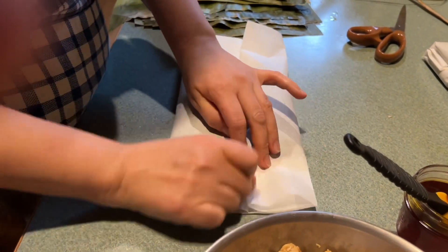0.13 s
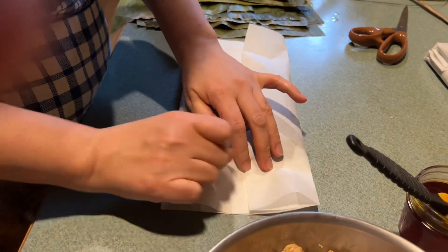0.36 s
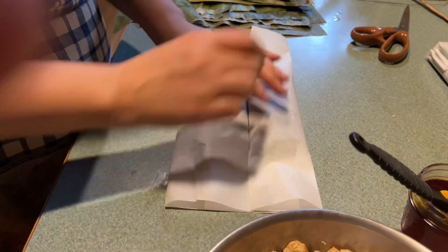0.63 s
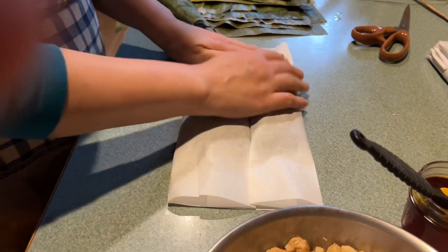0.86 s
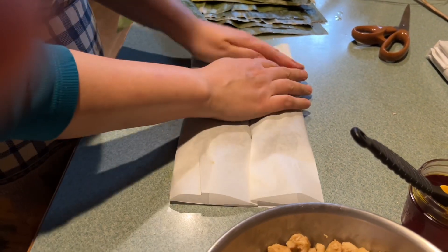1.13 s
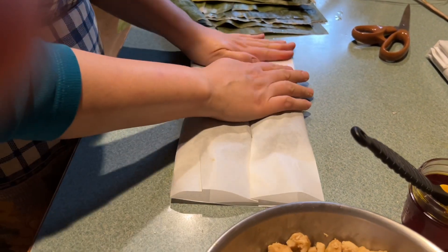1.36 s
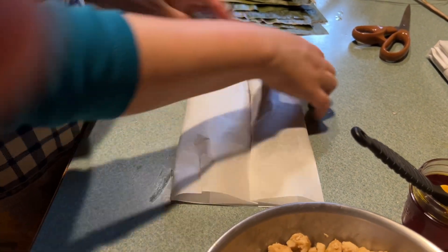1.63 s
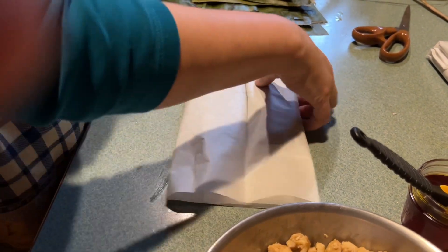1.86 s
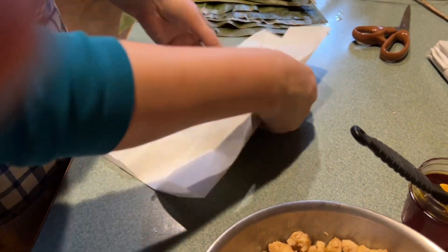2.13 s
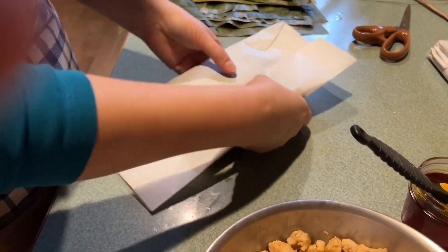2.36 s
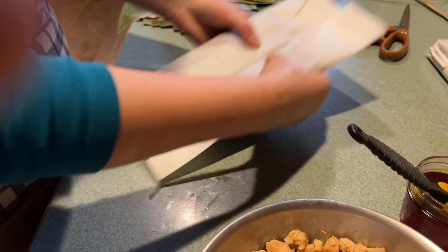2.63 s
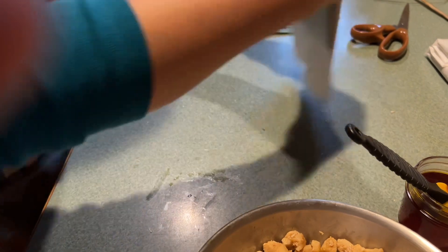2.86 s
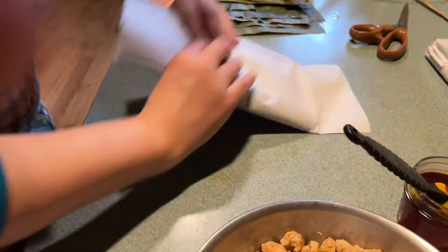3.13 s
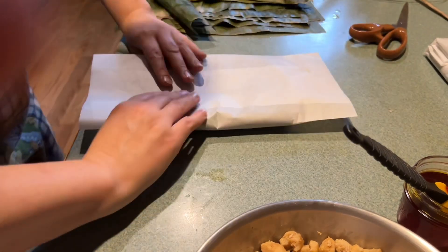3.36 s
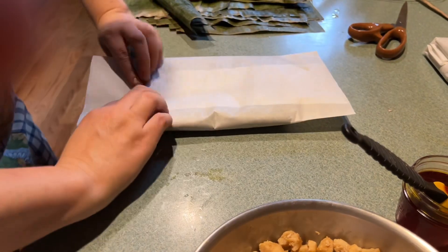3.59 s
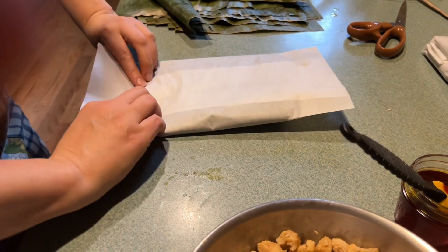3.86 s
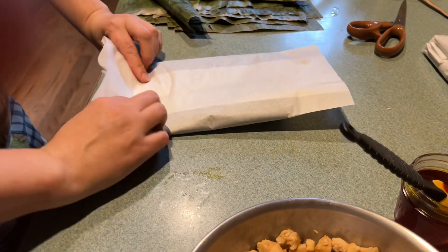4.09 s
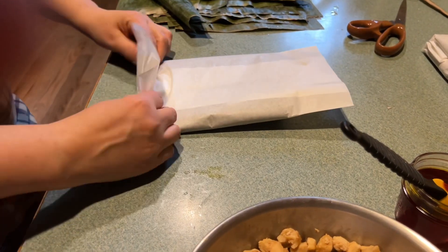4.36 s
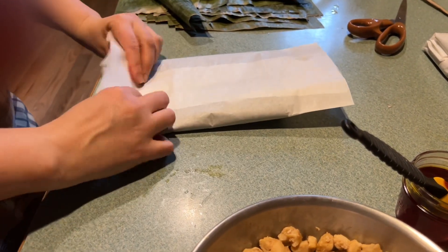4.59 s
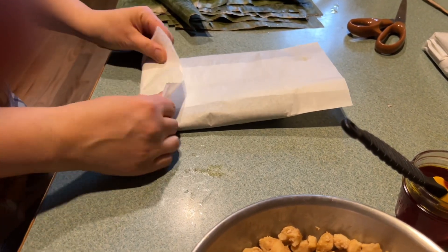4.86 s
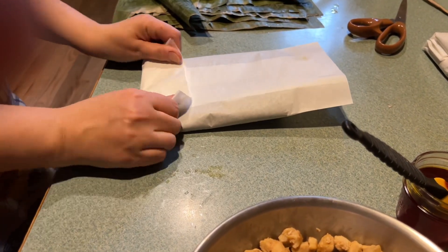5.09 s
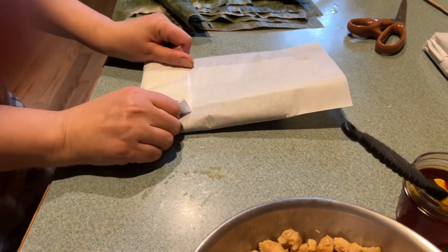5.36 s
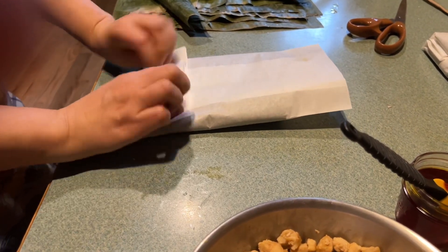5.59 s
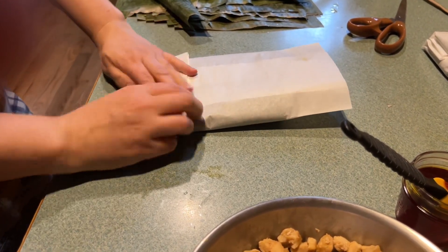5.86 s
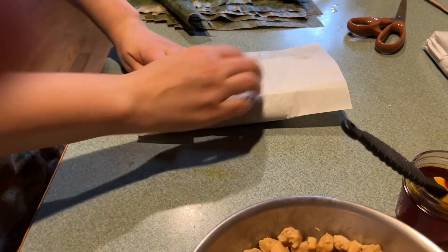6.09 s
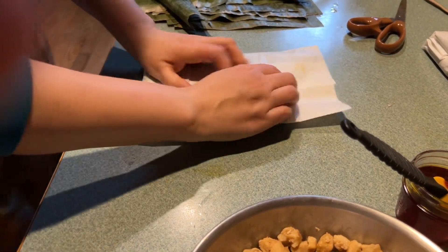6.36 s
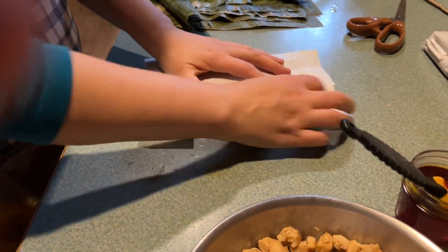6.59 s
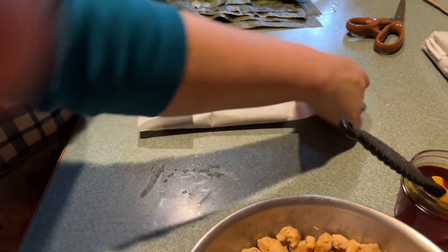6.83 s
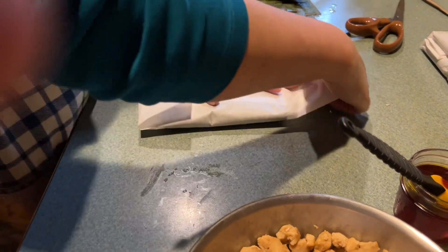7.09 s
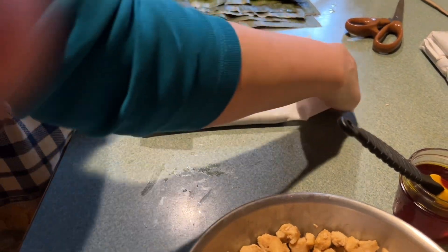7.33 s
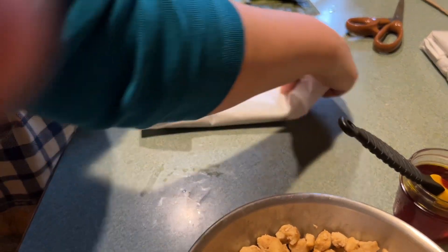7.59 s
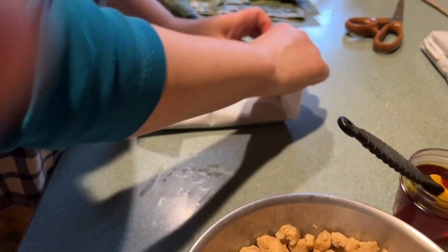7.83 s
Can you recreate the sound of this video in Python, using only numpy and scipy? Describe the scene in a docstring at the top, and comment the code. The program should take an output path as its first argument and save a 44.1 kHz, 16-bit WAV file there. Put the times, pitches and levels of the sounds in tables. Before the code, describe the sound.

Crisp, bright paper handling: loud crackles at the start, a quieter sliding rustle, one big sharp crumple as the sheet is flipped, then irregular snaps and creases that grow busy again in the last second or so. Occasional tiny hollow pops of flexing paper and dull counter bumps. Close stereo pickup, short small-room reflections, and a low appliance murmur underneath.

```python
"""On a kitchen counter, hands fold, crease and turn stiff paper around a parcel, close to a small stereo microphone.
Shaped noise makes the paper: sharp snaps, brief crushes of the whole sheet, fine crackle and a sliding rustle.
Damped sines make the short pitched pops of the sheet and the thuds of hands and parcel on the counter.
The kitchen answers with a short decaying noise tail over a low hum of filtered noise; a faint drone ends early."""
import sys
import numpy as np
from scipy import signal
from scipy.fft import rfft, irfft, next_fast_len
from scipy.io import wavfile
from scipy.ndimage import uniform_filter1d, map_coordinates

SR = 44100
rng = np.random.default_rng(int(sys.argv[2]) if len(sys.argv) > 2 else 0)


def invert_db(level):
    """Linear amplitude ratio for a level in decibels (20 dB per decade), elementwise."""
    return 10 ** (np.asarray(level, dtype=float) / 20)


def put_to_file(sound):
    """Save the sound as 16-bit audio at rate SR, in the file named by the first command-line argument."""
    columns = np.atleast_2d(sound).T  # one column per channel
    safe = np.clip(columns, -1, 1)
    whole_steps = np.round(safe * 32767)
    wavfile.write(sys.argv[1], SR, whole_steps.astype(np.int16))


N = 351036  # length in samples
USUAL_MS = 2.06  # typical length of a buckle


def unit(x):
    """Scaled to rms 1."""
    return x / np.sqrt(np.mean(x ** 2) + 1e-20)


def along(points, hz):
    """Reads a curve of (Hz, value) points on a log frequency axis."""
    f, v = np.transpose(points)
    return np.interp(np.log(hz + 1), np.log(f + 1), v)


def filtered(x, response):
    """x times a complex response of frequency."""
    m = next_fast_len(N + 8192)
    spectrum = rfft(x, m) * response(np.fft.rfftfreq(m, 1 / SR))
    return irfft(spectrum, m)[..., :N]


def ramp(hz, edge_hz):
    """A soft step from 0 to 1, one octave wide, around an edge."""
    octaves = np.log2((hz + 1) / (edge_hz + 1e-3))
    return np.sin(np.pi / 2 * np.clip(.5 + octaves, 0, 1))


def wobble(rate):
    """A smooth random curve, rate knots a second."""
    knots = rng.standard_normal(int(N * rate / SR) + 4)
    return map_coordinates(knots, [np.arange(N) * rate / SR])


def ports(pair):
    """Two unrelated sounds become one source heard at the two ports of the microphone."""
    # Likeness of the two channels. Each row: frequency in Hz, likeness from 0 to 1.
    likeness = [(60, 1), (200, 0.91), (400, 0.6), (1000, 0.47), (1480, 0.48), (1750, 0.84), (2300, 0.53),
                (3100, 0.26), (6000, 0.16), (8000, 0.39), (10000, 0.96), (11500, 1), (13000, 1),
                (16000, 0.6)]
    # Balance of the two channels. Each row: frequency in Hz, left over right in dB.
    balance = [(200, -0.2), (350, 3.5), (700, -0.5), (1700, 3.5), (2400, 1.5), (3100, 7), (3800, 1.5),
               (5900, 6), (7200, 1), (8600, -1)]
    # Phase between the two channels. Each row: frequency in Hz, lead of the left in radians.
    left_lead = [(500, 0), (1000, .3), (1450, 0), (1770, -2.2), (2150, 0), (2400, .3), (3100, 1.2),
                 (3800, 0), (5200, 1), (5900, 3), (6600, 0), (7200, -.2), (8600, -1.7), (9400, -2.9),
                 (10300, -3.2), (12000, -5.1), (12700, -6.1), (13900, -6.3), (15200, -8), (16400, -9)]

    def blend(hz):
        angle = np.arccos(np.clip(along(likeness, hz), 0, 1)) / 2
        return np.array([np.cos(angle), np.sin(angle)])

    def place(hz):
        half = invert_db(along(balance, hz) / 2) * np.exp(.5j * along(left_lead, hz))
        return np.array([half, 1 / half])

    same, other = filtered(pair, blend)
    return filtered(np.array([same + other, same - other]), place)


def paper():
    """Noise under the power envelope of each register, through the colour of the sheet."""
    # Colour of paper and microphone within a register. Each row: frequency in Hz, relative level in dB.
    sheet_colour = [(80, -21), (170, -19), (350, -16), (1000, -7.5), (1290, -9.5), (1390, -2), (1490, -1),
                    (1640, 0), (1800, 2), (2200, -2), (2500, -5.5), (4000, -7), (5900, -2), (7300, 6.5),
                    (8200, 11), (9400, 4), (11000, 15.5), (13500, 2), (15000, 9.5), (15900, 2),
                    (16400, -25), (17000, -90)]
    # Borders between the six registers: low, warm, body, mid, bright, edge. One column: frequency in Hz.
    borders = [600, 1300, 2500, 5500, 9500]
    edges = [0, *borders, SR]
    grid_hz = np.linspace(0, SR / 2, 2000)
    pair = np.zeros((2, N))
    for k, power in enumerate(snaps() + crackle() + crushes()):
        def band(hz):
            lower, upper = ramp(hz, edges[k]), np.sqrt(1 - ramp(hz, edges[k + 1]) ** 2)
            return invert_db(along(sheet_colour, hz)) * lower * upper

        noise = np.sqrt(power) * rng.standard_normal((2, N))
        sound = filtered(noise, band) / np.sqrt(np.mean(band(grid_hz) ** 2))
        pair += steadied(sound, power, size=400 // (k + 1))
    # the buckling spot wanders from side to side
    lean_db = 0.93 + 2.25 * wobble(8.4)
    return ports(mottled(pair, depth_db=3.0)) * invert_db(np.outer([.5, -.5], lean_db))


def snaps():
    """Power per register of the large buckles; a quicker buckle has a sharper edge."""
    # The clearest buckles. Each row: peak time in seconds, level in dB, body relative to the snap in dB,
    # warmth relative to the snap in dB, nominal length in ms; the registers trim and scatter these.
    clear_buckles = [(0.0344, -26.5, -5, -11, 3.2), (0.0635, -25, -2.5, -16, 1.1), (0.1097, -22, 5, -13, 4),
                     (0.1418, -23.5, -10, -24, 1.5), (0.1531, -25.5, 2.5, -13, 1.5),
                     (0.1829, -29, 5, -12, 2.4), (0.1937, -29.5, 1, -0.5, 3.2), (0.3153, -39, 3.5, -4, 1.4),
                     (0.4081, -22, 3.5, -18, 2.1), (0.4153, -21.5, 4, -14, 2.1),
                     (0.4225, -13, -15, -15, 1.4), (0.4629, -19.5, -5, -10.5, 1.8),
                     (0.4783, -28, -8, -10, 1.3), (0.488, -27.5, -23, -26, 1.5),
                     (0.4951, -25.5, -3.5, -13.5, 2.8), (0.7958, -28, -1, -11, 2.7),
                     (0.8276, -37.5, 5.5, -15, 4.3), (0.8739, -33.5, 1, -7, 4.0),
                     (0.9254, -39, 0, -22.0, 2.8), (0.9439, -37, -8, -19, 1.4),
                     (1.0015, -27, -15, -22, 1.9), (1.0468, -42, 0.0, -17, 3),
                     (1.1447, -18.5, -6, -11, 2.7), (1.1835, -27, -22, -6, 1.3),
                     (1.1991, -38, -11, -8, 1.6), (1.2541, -37.5, 6, -9, 4.8), (1.3194, -35.5, 1, -11, 1.3),
                     (1.351, -39, 0, -3, 2.2), (1.3989, -38.5, 13, -16, 1.8), (1.4357, -25.5, 1, -26, 1.2),
                     (1.4543, -41, 2, -0.5, 3.1), (1.4783, -40, 14.5, -21, 1.4), (1.519, -32, -2, -25, 2.5),
                     (1.5397, -33, -5, -26.0, 3.6), (1.7585, -29, -4.5, -9.5, 4.1),
                     (1.8498, -36, 4, -21, 4), (1.8644, -33, 1, -19, 2.7), (1.8759, -31, 2, -16, 1.9),
                     (1.9154, -29, -7.5, -17, 2.5), (1.9486, -32.5, 1, -18, 4.6),
                     (1.9922, -36.5, -9, -13.0, 2.3), (2.0987, -35, -4, -20, 1.6),
                     (2.1253, -25.5, -2.5, -19, 3.3), (2.1832, -31, -7, -25, 2.2),
                     (2.3027, -39.5, 5, -4, 3.2), (2.3251, -27.5, -16, -15, 1), (2.3435, -36, 3, -15, 2.3),
                     (2.3649, -45, -20, -17, 2), (2.4371, -33.5, -1, -18, 1.3), (2.4695, -39, 2, 0, 2.1),
                     (2.5073, -42, -11, 3.5, 3.3), (2.5245, -35.5, -0.5, -5, 3.2), (2.546, -48, 3, 4, 3),
                     (2.588, -43, 4, 0, 3), (2.6112, -36.5, 2, -4.5, 4.9), (2.6899, -49.5, 11, -9, 1.4),
                     (2.7121, -40.0, -5, -17, 1.8), (2.745, -36, 0, -8, 2.6), (2.7614, -34, -2, -7.5, 4.5),
                     (2.8002, -39.5, -1, -6, 3.8), (2.9971, -37, -4, -9, 3.1),
                     (3.0323, -25.5, -5.5, -9, 2.9), (3.0531, -35, 6, -3, 3.1),
                     (3.1345, -14, -46, -20, 4.2), (3.2015, -25.5, -7, -12, 5.8),
                     (3.2117, -32, 0, -13, 2.8), (3.2395, -29, -4.0, -14, 2.3), (3.2744, -32, -8, -19, 3.1),
                     (3.3404, -37.5, 11, -15, 2.0), (3.3538, -32, -7.5, -23, 1.6),
                     (3.3963, -29.5, -5, -25, 3.6), (3.4147, -30, -0.5, -7, 2.2),
                     (3.4233, -27.5, 1, -11, 3.5), (3.4645, -33, 3.5, -8.5, 4.6),
                     (3.5408, -39, -1.5, -18, 3.7), (3.5978, -56, -5, -14, 2.1), (3.6157, -42, 2, 0, 2.6),
                     (3.6333, -26.5, -1, -4, 2.3), (3.6517, -23.5, 3, -5.5, 1.6),
                     (3.6741, -26, -4, -23, 1.2), (3.731, -35, 4, -11, 1.7),
                     (3.7396, -17, -20.5, -14, 1.74), (3.7554, -25, -22, -26.0, 0.69),
                     (3.8002, -34.5, 0.0, -1, 5.4), (3.8183, -36, 3, -20, 1.9), (3.827, -31, -4, -6, 2.7),
                     (3.8344, -33.5, -2, -15, 2.8), (3.862, -38, -7, -20, 1.3), (3.9016, -34, -3, -17, 3.9),
                     (3.9269, -34.5, 4, -6, 1.9), (3.9695, -28, -10, -17, 5.1), (4.011, -36, 4, -7, 2.8),
                     (4.0276, -30, -11, -8, 4.9), (4.0758, -24, -24, -16, 2),
                     (4.1039, -24.5, -7, -10.5, 2.4), (4.1441, -23, -21, -20, 1.3),
                     (4.1609, -24, -33, -34.0, 2), (4.1838, -30, -15, -27, 2), (4.1993, -19, -17, -15, 2),
                     (4.2072, -32, -16, -29.0, 2.5), (4.2339, -24.5, -27, -22, 3.2),
                     (4.2472, -28, -14, -19, 2.8), (4.2661, -29, -13, -15, 1.8),
                     (4.3006, -30, -23, -24.0, 1.4), (4.3078, -30, -25, -16, 1.3),
                     (4.3866, -36, -21, -16, 2.4), (4.4746, -30, -3.5, -9, 2.5),
                     (4.4873, -31.5, -3, -9, 3.5), (4.6102, -30.5, -7, -8, 3.4),
                     (4.6328, -25.5, -4, -14, 2.3), (4.6473, -25.5, 0, -19, 2),
                     (4.6555, -30, -12, -23.0, 1.4), (4.6813, -20.5, -8, -4.5, 1),
                     (4.6879, -22, 2, -18, 2.1), (4.7781, -22, -26, -18, 2.8), (4.7961, -32.5, 3, -18, 1.7),
                     (4.8096, -27.5, -20, -8.5, 2), (4.8232, -26.5, -16, -26, 5.1),
                     (4.847, -37.5, 4.5, -8, 2.7), (4.9055, -25, -4, -13, 1.5),
                     (4.9317, -31.5, 0, -29, 1.9), (4.9624, -27, -21, -35, 5.5),
                     (5.0318, -26.5, -8, -16, 4.2), (5.0525, -36, 0, -25, 1.7),
                     (5.1362, -30.5, -3, -27, 0.7), (5.1715, -31.5, -3, -19, 2.2),
                     (5.2228, -31.5, -7.5, -20, 2.4), (5.2772, -26, 2.5, -18, 0.95),
                     (5.3211, -27, -22, -17.5, 1.4), (5.3341, -44, 2, -20.0, 2),
                     (5.3957, -38, -8, -23, 1.3), (5.4233, -28, -11, -16, 1.3),
                     (5.4454, -24.5, -28, -17, 1), (5.4751, -35, -7, -10, 1.2),
                     (5.5002, -28, -3.5, -17, 3.3), (5.5516, -35, -9.0, -22, 3.3),
                     (5.6681, -38, -18.0, -17, 2.5), (5.7415, -29.5, -9, -30, 1.9),
                     (5.7826, -32.5, -7, -13, 2.2), (5.8429, -26.5, 3.5, -4, 1.6),
                     (5.8737, -24, -7, -26, 0.79), (5.9205, -30.5, -6, -19, 1.7),
                     (5.9333, -31.5, -8, -26, 1.3), (5.9878, -38, -3, -6, 2.3),
                     (6.0251, -37, 12.5, -2.5, 1.6), (6.0366, -36.0, -3, -32, 2.9),
                     (6.0654, -31, 1, -12, 1.9), (6.1441, -32, -2, -10, 1.5),
                     (6.2405, -26.5, 1.5, -17, 2.3), (6.2512, -27, 2, -5, 2.4),
                     (6.2743, -24.5, 5, -10, 1.9), (6.2981, -21, 2.5, -15, 2.7),
                     (6.311, -24.5, -15, -28, 4.2), (6.3981, -36.5, 8, -16, 2.6),
                     (6.4322, -38, 8, -18, 2.1), (6.4674, -24.5, -1.5, -32, 3.2), (6.5021, -32, 7, -21, 1),
                     (6.522, -40.0, 14, -30, 2.2), (6.6197, -33, 1, -7.5, 4.8),
                     (6.6899, -29.5, -4, -11, 3.8), (6.7442, -26, -8, -11, 2), (6.8036, -34, -14, -27, 2.4),
                     (6.8337, -24, -8.5, -7.5, 2.9), (6.8767, -41, 0, -3, 2), (6.9188, -34, -1, -21, 5.7),
                     (6.9953, -28.5, 3, -11, 4.5), (7.0175, -23, -5, -10.5, 2.2), (7.0804, -21, 2, -9, 1.6),
                     (7.1067, -16.5, -12, -14, 1.3), (7.1451, -27, 3.5, -6.5, 2.5),
                     (7.1736, -25.5, 3, -6, 1.6), (7.1844, -28.5, -7, -3, 2.2),
                     (7.2088, -21.5, -4, -33, 3.4), (7.2547, -26, -3, -11, 1.1),
                     (7.2837, -19, -4, -9, 0.86), (7.301, -24.5, 0.5, -0.5, 2.8),
                     (7.34, -28.5, 2.0, -5, 2.2), (7.3801, -37, 2, -22, 3), (7.3959, -28.5, 0, -10, 3.8),
                     (7.4307, -25, -3, -25, 1.9), (7.4436, -33, 4, -9, 3.1), (7.4693, -32.5, 6, -8, 2.8),
                     (7.4806, -33, 4, -4, 2.2), (7.4951, -27.5, 2, -8, 4.1), (7.5202, -24, 3.5, -12, 1.4),
                     (7.5825, -34.5, 0, -14, 3.9), (7.6849, -35, -1, -9, 4.7), (7.7053, -30, 0, -25.0, 2.5),
                     (7.7149, -33, -1, -14, 3), (7.7356, -37, -12, -16, 1.3),
                     (7.7522, -36.5, -19.0, -26, 1.7), (7.7863, -31.5, 3.5, -6, 2.4),
                     (7.8066, -30.5, -1, -4.5, 1.4), (7.8356, -30.5, 6.5, -10, 2),
                     (7.8719, -33, 7, -1, 3.6), (7.9023, -35, 3, -3.5, 3.2), (7.9181, -41.5, 4, -6, 2.9)]
    # large panels of the sheet flex for longer than its edges
    stretches = (2.25, 1.35, 0.93, 0.94, 0.93, 0.59)
    rows = [*clear_buckles, *lesser()]
    power = np.zeros((6, N + 700))
    for (s, db, body_db, warm_db, ms), chance in zip(rows, rng.standard_normal((len(rows), 3))):
        low, tilt, edge = chance
        levels = db + np.array([
            warm_db - 7.5 + 2.5 * low,
            warm_db - .3,
            body_db - 0.75,
            -2 + 0.12 * body_db + 1.54 * tilt,
            -3.2 - 1.9 * tilt,
            1.5 - 6 * np.log2(ms / USUAL_MS) + 2 * edge])
        shapes = np.array([burst(ms * stretch) for stretch in stretches])
        power[:, round(s * SR):][:, :700] += invert_db(2 * levels)[:, None] * shapes
    return power[:, 200:N + 200]


def lesser(count=30):
    """More buckles, in the columns of the clear ones, at chance moments and as strong as the handling allows."""
    at = rng.integers(0, N, count)
    size, body, warm, length = rng.standard_normal((count, 4)).T
    fine_db, body_db = 10 * np.log10(effort()[:, at])
    level_db = np.minimum(fine_db + 3.5 + 2 * size, -38)
    length_ms = USUAL_MS * np.exp(.3 * length)
    return np.transpose([at / SR, level_db, body_db - fine_db + 4 * body, -17.0 + 4 * warm, length_ms])


def burst(length_ms):
    """Power envelope of one buckle, highest at sample 200: faint lead-in, quick swell and fall, short after-rustle."""
    u = (np.arange(700) - 200) / SR * 1000 / np.clip(length_ms, .2, 9)  # time in buckle lengths
    skirt = .16 * np.where(u < 0, np.exp(-(u / 1.5) ** 2), np.exp(-np.abs(u) / .9))
    return 0.64 * np.exp(-(u / 0.43) ** 2) + skirt


def crackle(count=1800):
    """Power of countless small buckles in clumps, few large and many faint, over the rustle of sliding paper."""
    fine, body = effort()
    register_db = np.array([-11.0, -5.5, -2.0, -1.5, -7.5, -5.0])
    level = invert_db(2 * register_db)[:, None] * [body, body, body, fine, fine, fine]
    at = rng.integers(0, N, count)
    size_db = 1.46 * np.minimum(rng.exponential(1, count), 3.5) + 2.36 * wobble(40)[at]
    colour_db = 3.27 * rng.standard_normal((6, count))
    kicks = np.array([np.bincount(at, invert_db(2 * (size_db + c)), N) for c in colour_db])
    shapes = np.array([burst(ms) for ms in (4.9, 2.4, 1.25, 2.0, 2.2, 2.9)])
    grains = np.abs(signal.fftconvolve(kicks, shapes, axes=1)[:, 200:N + 200])
    grains /= grains.mean(1, keepdims=True)
    # the rustle flutters as a whole and in each register alone
    flutter_db = 0.2418 * wobble(13.0) + 2.604 * np.array([wobble(25) for _ in shapes])
    rustle = invert_db(2 * (-10.23 + flutter_db))
    return level * (invert_db(2 * -3.5) * grains + rustle)


def effort():
    """Power of the fine and the body registers as the hands work the sheet, each move swelling and dying away."""
    # Moves of the hands. Each row: height in seconds, crackle level in dB, swell in dB per second,
    # fade in dB per second.
    moves = [(.13, -32.5, 218, 116), (0.451, -36.5, 251, 136), (.56, -61, 100, 50), (0.81, -40.5, 700, 77),
             (1.174, -37, 405, 63), (1.47, -63, 124, 85), (1.535, -41.5, 109, 295),
             (1.756, -47.5, 303, 200), (1.87, -55.5, 154, 36), (2.151, -38.5, 58, 99), (2.31, -44, 150, 43),
             (2.5, -46, 34, 74), (2.63, -44.5, 120, 400), (2.755, -52, 400, 92), (2.95, -46, 92, 85),
             (3.14, -28, 246, 56), (3.40, -41.5, 25, 85), (3.65, -43.5, 106, 100), (3.81, -51.5, 80, 88),
             (4.25, -42.5, 20.5, 43), (4.67, -34, 111, 250), (4.812, -35.5, 167, 343), (5.06, -46, 34, 92),
             (5.47, -44, 133, 86), (5.77, -47, 33, 26), (6.29, -44.5, 92, 108), (6.51, -40, 42, 87),
             (6.76, -40.5, 95, 61), (7.3, -38.5, 28, 38), (7.49, -47.5, 22, 73), (7.69, -44, 94, 33)]
    # How much broad sheet is in play. Each row: time in seconds, body relative to the fine crackle in dB.
    breadth = [(0, 2), (.5, 1), (.9, 2), (1.4, -2.5), (1.7, 4.5), (2.3, 1), (3.3, -3.5), (3.75, 4),
               (4.3, 0), (4.8, -2.5), (5.25, 1.5), (5.5, -0.5), (6.7, 3), (7.96, 1)]
    t = np.arange(N) / SR
    fine = np.zeros(N)
    for s, db, swell, fade in moves:
        drop_db = np.where(t < s, swell * (s - t), fade * (t - s))
        fine += invert_db(2 * (db - drop_db))
    breadth_db = np.interp(t, *np.transpose(breadth))
    return np.array([fine, fine * invert_db(2 * breadth_db)])


def crushes():
    """Power per register when the whole sheet gives at once: buckles too dense to tell apart, a rough roar."""
    # The sheet crushed. Each row: start in seconds, length in seconds, level of the upper registers in dB,
    # level of the body registers in dB; each register then takes its share.
    crush_rows = [(0.094, 0.038, -32.5, -28.5), (0.4, 0.03, -35, -28.5), (1.121, 0.026, -43, -39.5),
                  (2.134, 0.034, -39.5, -35), (3.092, 0.057, -23, -22), (4.668, 0.04, -38.5, -36),
                  (5.489, 0.012, -43, -42), (6.174, 0.085, -41, -34), (6.266, 0.069, -45, -35)]
    t, power = np.arange(N) / SR, np.zeros((2, N))
    for start, length, *db in crush_rows:
        rise, fall = (t - start) / (0.28 * length), (start + length - t) / (0.22 * length)
        swell = np.clip(np.minimum(rise, fall), 0, 1)
        power += invert_db(2 * np.array(db))[:, None] * swell ** 2
    share = invert_db(2 * np.array([-13.0, -6.5, -3.5, 0.0, -2.5, -0.5]))[:, None]
    roughness_db = 2.0 * wobble(300)
    return share * power[[1, 1, 1, 0, 0, 0]] * invert_db(2 * roughness_db)


def steadied(sound, power, size):
    """The noise's chance swing in level over size samples is partly evened out, towards the intended envelope."""
    want = np.abs(uniform_filter1d(power, size))
    got = np.abs(uniform_filter1d(sound ** 2, size, axis=1))
    want, got = want / want.mean(), got / got.mean()
    correction = (want + 1e-6) / (got + 0.28 * want + 1e-6)
    return sound * correction ** (.7 / 2)  # an exponent of 1/2 would apply the correction in full


def mottled(pair, depth_db):
    """Every patch of the sheet has its own colour: random gain over about 1 kHz by a few ms."""
    z = signal.stft(pair, nperseg=256)[2]
    field = uniform_filter1d(rng.standard_normal(z.shape[1:]), size=5, axis=0)  # across frequency
    field = uniform_filter1d(field, size=3, axis=1)  # across time
    out = signal.istft(z * invert_db(depth_db * unit(field)), nperseg=256)[1][:, :N]
    return out * np.std(pair) / np.std(out)


def flexes(count=500):
    """Broad panels of the sheet pop in or out and ring for a few cycles; many small ones follow the handling."""
    # The clear pops. Each row: start in seconds, nominal level in dB, pitch in Hz.
    clear_pops = [(.795, -31, 1500), (1.0005, -30, 1460), (1.984, -45, 370), (2.76, -40, 1600),
                  (4.235, -40, 517), (4.265, -41, 500), (4.32, -44, 550), (4.362, -41, 496),
                  (4.445, -45, 550), (4.805, -36.5, 520), (5.2765, -25.5, 3070), (5.842, -21.5, 1770),
                  (5.8435, -34, 930), (7.077, -32, 735), (7.208, -17, 4720), (7.297, -34.5, 440),
                  (7.337, -33, 715), (7.595, -39, 483), (7.685, -44, 380), (7.836, -39, 428),
                  (7.872, -36, 397)]
    decay_cycles, rise_cycles = 2.375, 0.86
    at = rng.integers(0, N, count)
    size, pitch = rng.standard_normal((count, 2)).T
    small_db = 10 * np.log10(effort()[1, at]) - 3 + 2.5 * size
    small_hz = np.clip(2410 * np.exp(0.72 * pitch), 250, 9000)
    pops = np.concatenate([clear_pops, np.transpose([at / SR, small_db, small_hz])])
    s, db, hz = pops.T[:, :, None]
    k = np.arange(2048)
    turns = hz * k / SR  # cycles since the start of the pop
    envelope = np.exp(-turns / decay_cycles) * (1 - np.exp(-turns / rise_cycles))
    rings = invert_db(db + 6) * envelope * np.sin(2 * np.pi * turns)
    places = np.round(s * SR).astype(int) + k
    ring = np.bincount(places.ravel(), rings.ravel())[:N]
    return np.pad(ring, (0, N - len(ring))) * invert_db([[1.5], [-1.5]])  # leans left


def thuds():
    """Hands and parcel meet the counter: a soft contact gives a dull knock, then the counter booms."""
    # Contacts. Each row: start in seconds, nominal level in dB, nominal level of the knock relative to that in dB.
    contacts = [(0.426, -33.5, -10), (1.144, -36, -1), (1.265, -44, 8.5), (1.439, -50, -21),
                (1.753, -47, -11), (2.029, -41.5, 2), (2.124, -53, 16), (2.376, -54, 11), (2.545, -51, 14),
                (3.129, -33.5, -12), (3.328, -48, -10), (3.737, -44, -2), (4.201, -51, 11),
                (4.608, -52, 11), (6.316, -48, -13), (6.665, -40.5, -3), (6.739, -37, 10), (6.845, -43, 3),
                (7.106, -48, -6), (7.5, -47, 2)]
    # Resonances of the counter. Each row: frequency in Hz, mean level in dB, time to fall 60 dB in seconds.
    resonances = [(88, 7.5, 0.1), (100, -7, 0.13), (62, -35, 0.11), (154.3, 3.5, 0.074)]
    out, t = np.zeros(N + SR), np.arange(SR // 4) / SR
    for s, db, knock_db in contacts:
        boom = np.zeros(len(t))
        for hz, level, t60 in resonances:
            boom += invert_db(level + rng.normal(0, 1.7) - 60 * t / t60) * np.sin(2 * np.pi * hz * t)
        # the contact spreads, so the knock sinks in pitch
        sag_hz = 88 + 230 * np.exp(rng.normal(0, 0.08) - t / 0.0127)
        knock = invert_db(knock_db - 3.5 - 60 * t / 0.085) * np.sin(2 * np.pi * np.cumsum(sag_hz) / SR)
        boom *= 1 - np.exp(-t / 0.0098)
        knock *= 1 - np.exp(-t / 0.00062)
        out[round(s * SR):][:len(t)] += invert_db(db - 0.3) * (boom + knock)
    return out[:N]


def kitchen(x, size=8192):
    """The room's answer dies at its own speed at each frequency; each block of size samples gets a fresh noise tail."""
    # Decay of the room. Each row: frequency in Hz, time to fall 60 dB in seconds.
    decay = [(200, 0.54), (500, 0.26), (2000, 0.21), (8000, 0.19), (16000, 0.066)]
    wet = np.zeros((2, N + SR))
    for at in range(0, N, size):
        hz, t, z = signal.stft(rng.standard_normal((2, SR // 2)), SR, nperseg=256)
        fall = invert_db(-60 * t / along(decay, hz)[:, None])
        onset = np.tanh(t / 0.0026 + 2.2)
        tail = signal.istft(z * fall * onset, SR, nperseg=256)[1]
        tail /= np.linalg.norm(tail[0])
        answer = signal.fftconvolve(x[None, at:at + size], tail, axes=1)
        wet[:, at + 180:][:, :answer.shape[1]] += answer  # 180 samples: about 4 ms late
    return ports(wet[:, :N])


def hum():
    """The murmur of appliances: filtered noise, slightly unsteady in level."""
    # Colour of the hum. Each row: frequency in Hz, relative level in dB.
    hum_colour = [(20, -43), (40, 5), (65, -6), (97, 7.5), (145, -6), (195, 1.5), (257, -8), (314, -4.5),
                  (540, -17.5), (713, -40), (2070, -18), (3080, -24), (9000, -33), (13800, -29),
                  (16000, -45), (17000, -100)]
    noise = filtered(rng.standard_normal((2, N)), lambda hz: invert_db(along(hum_colour, hz)))
    level_db = -58 + 0.67 * wobble(3.9)
    return invert_db(level_db) * unit(ports(noise))


def drone():
    """A few fuzzy low tones, narrow bands of noise, that hang in the room and then stop."""
    # Tones of the drone. Each row: frequency in Hz, width in Hz, relative level in dB.
    drone_tones = [(316.5, 11, 6), (448, 28, 2), (525, 26, -6)]
    level_db, end_s, fade_s = -57.5, 0.696, 0.032

    def tones(f):
        return sum(invert_db(db) / (1 + ((f - hz) / width) ** 2) for hz, width, db in drone_tones)

    fade = 1 / (1 + np.exp((np.arange(N) / SR - end_s) / fade_s))
    return invert_db(level_db) * fade * unit(ports(filtered(rng.standard_normal((2, N)), tones)))


def scene():
    """Paper, pops and thuds, the room's answer, its hum and the drone."""
    dry = paper() + flexes() + thuds()
    return dry + invert_db(-13.5) * kitchen(dry[0]) + hum() + drone()


def top_cut(x):
    """Nothing passes above the cut-off."""
    return signal.sosfilt(signal.butter(12, 16800, fs=SR, output="sos"), x)


def record(dry):
    """The deepest bass is rolled off and everything above 16.7 kHz is removed."""
    mix = filtered(dry, lambda hz: ramp(hz, 50.7) * (hz < 16700))
    return top_cut(mix)


dry = scene()
out = record(dry)
put_to_file(out)
```